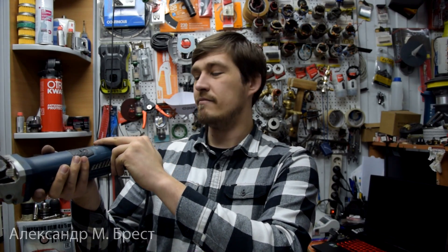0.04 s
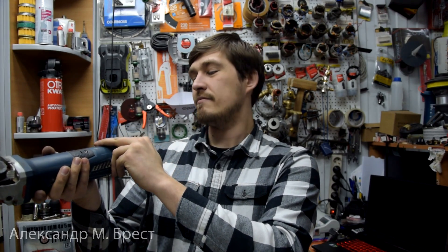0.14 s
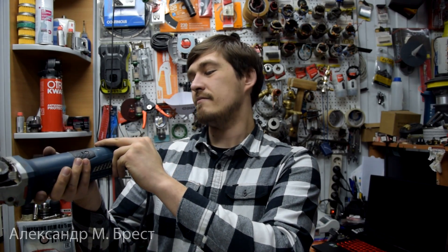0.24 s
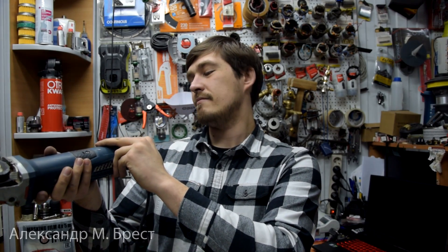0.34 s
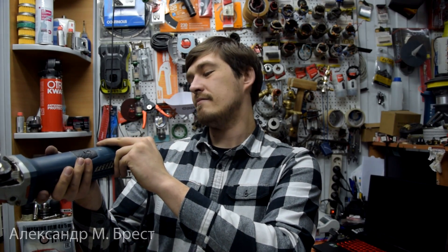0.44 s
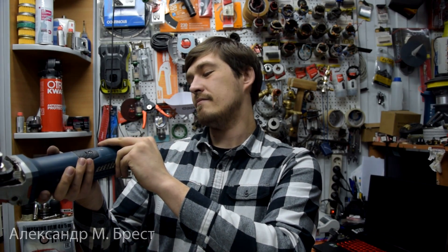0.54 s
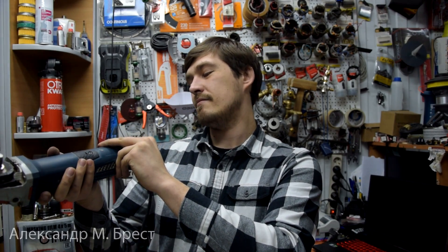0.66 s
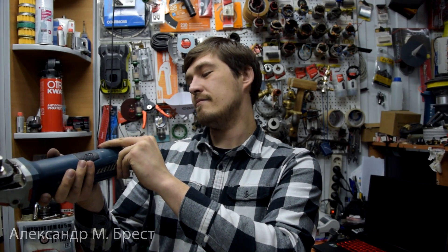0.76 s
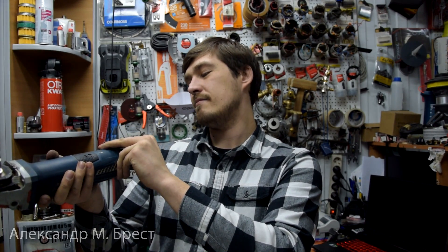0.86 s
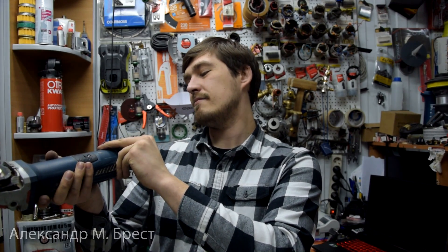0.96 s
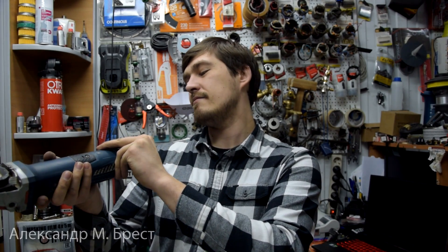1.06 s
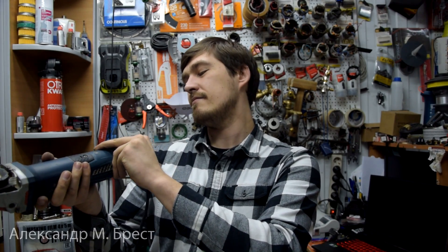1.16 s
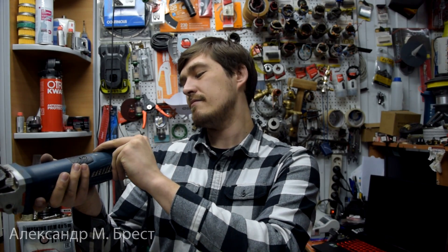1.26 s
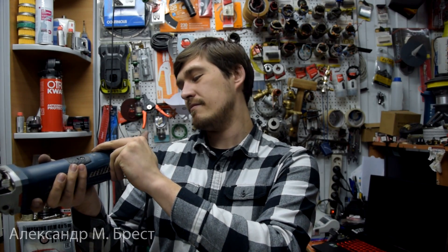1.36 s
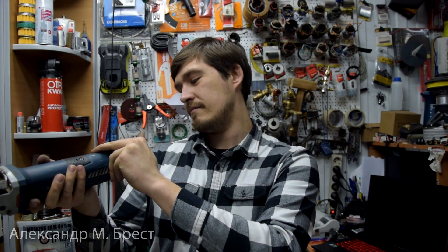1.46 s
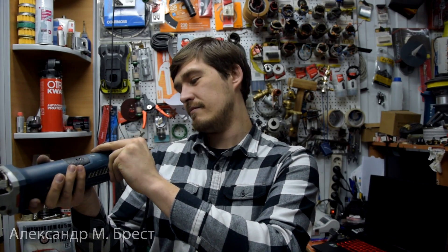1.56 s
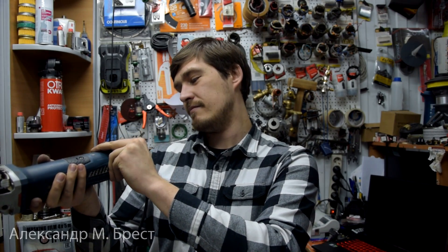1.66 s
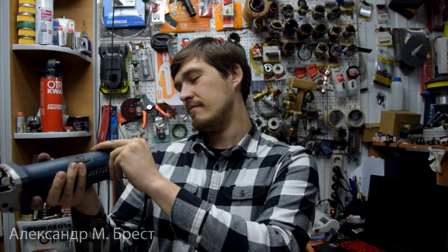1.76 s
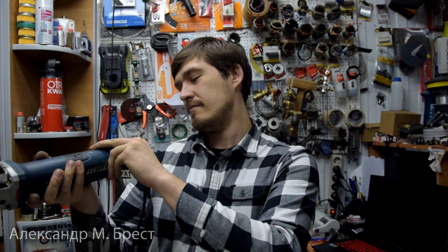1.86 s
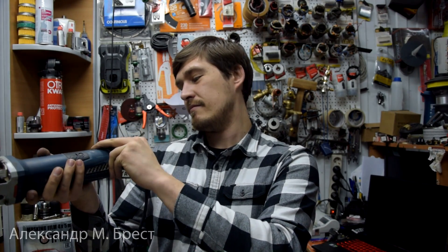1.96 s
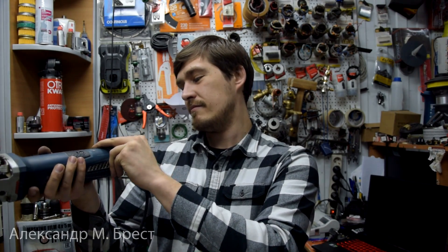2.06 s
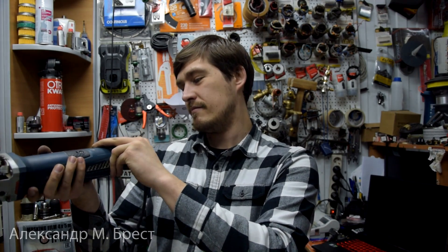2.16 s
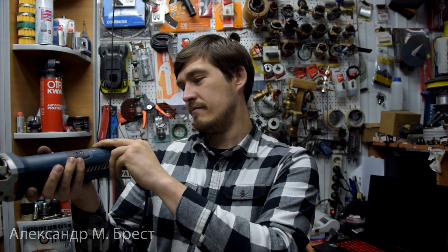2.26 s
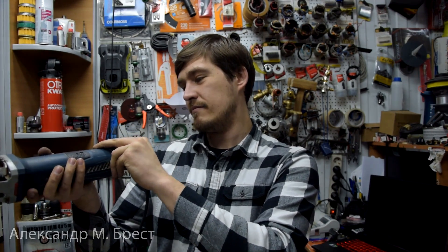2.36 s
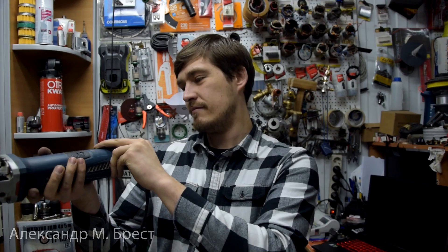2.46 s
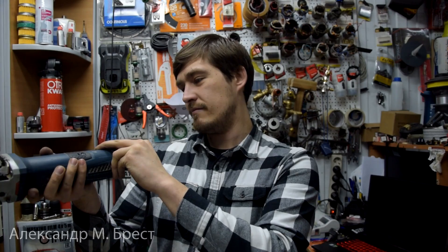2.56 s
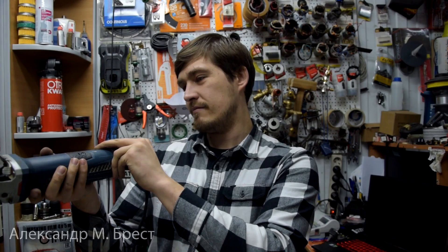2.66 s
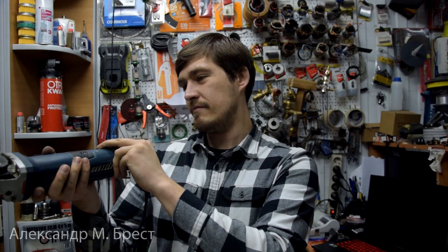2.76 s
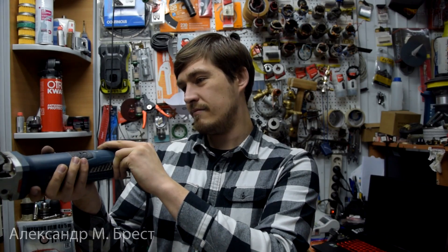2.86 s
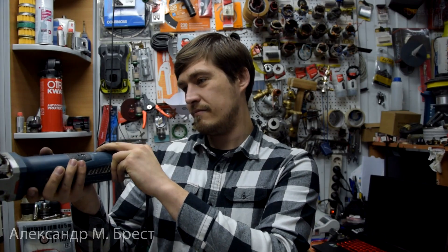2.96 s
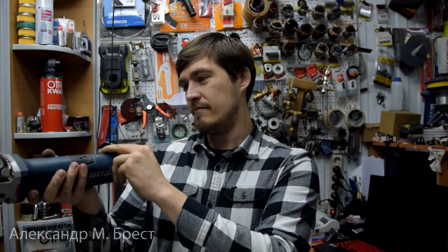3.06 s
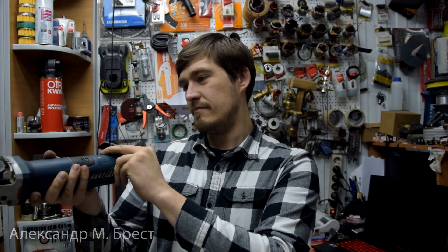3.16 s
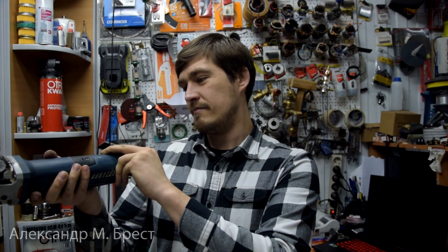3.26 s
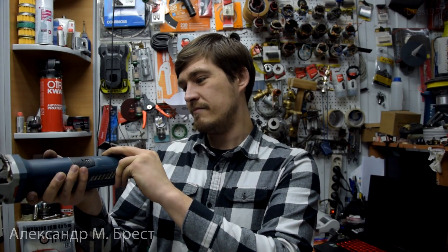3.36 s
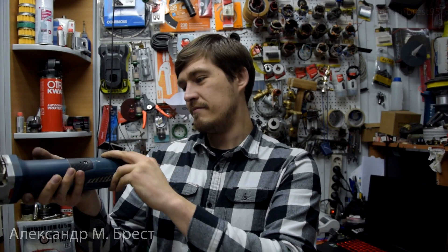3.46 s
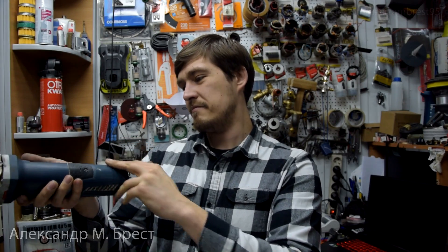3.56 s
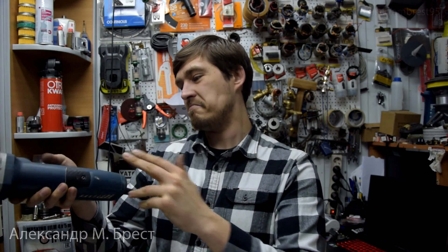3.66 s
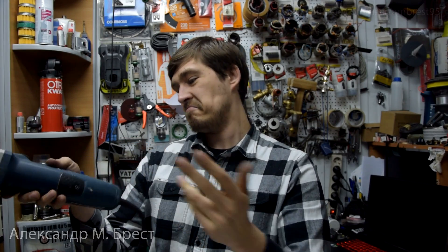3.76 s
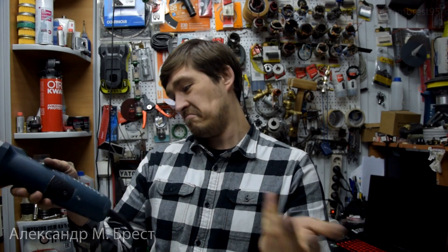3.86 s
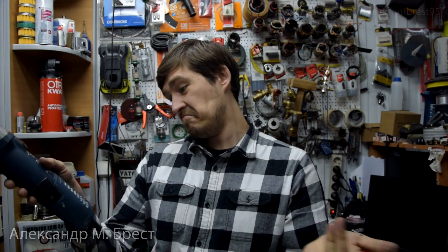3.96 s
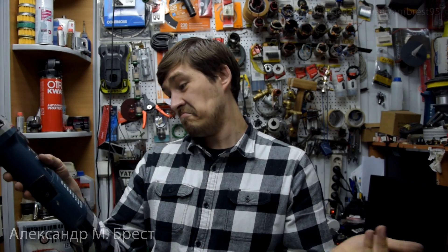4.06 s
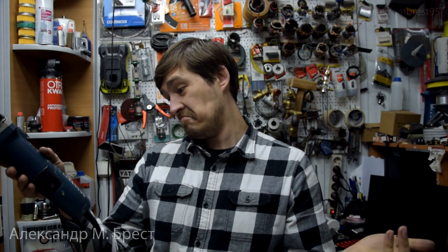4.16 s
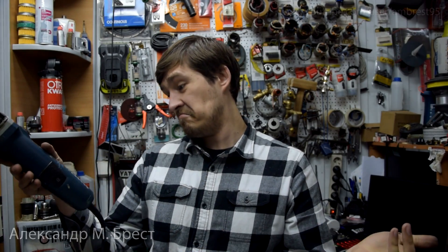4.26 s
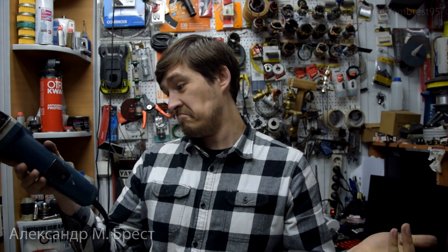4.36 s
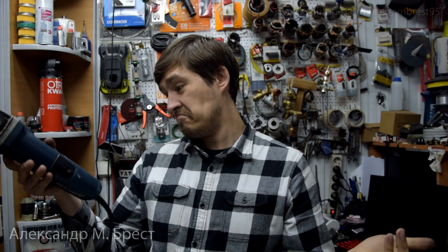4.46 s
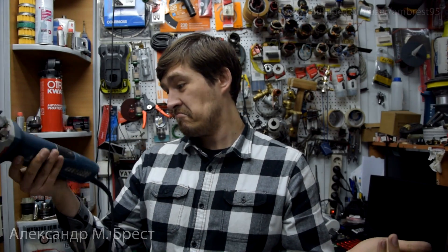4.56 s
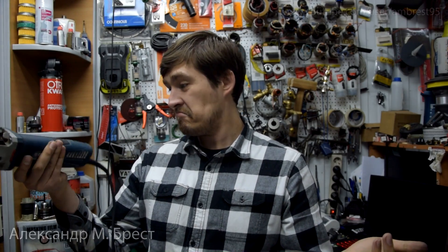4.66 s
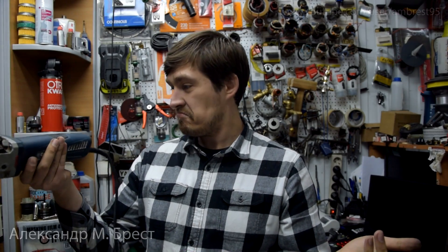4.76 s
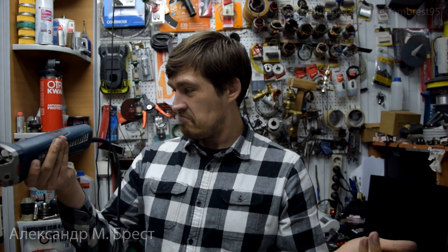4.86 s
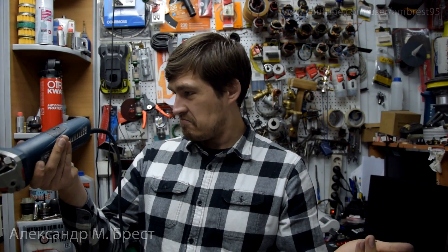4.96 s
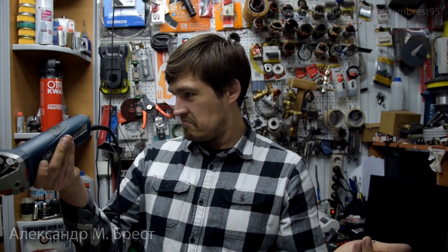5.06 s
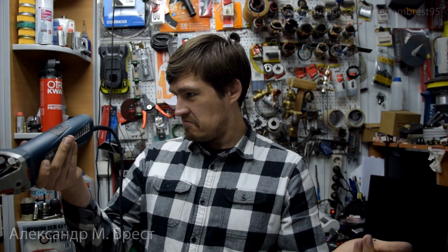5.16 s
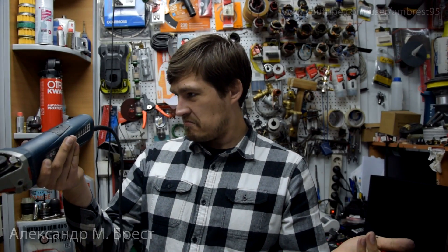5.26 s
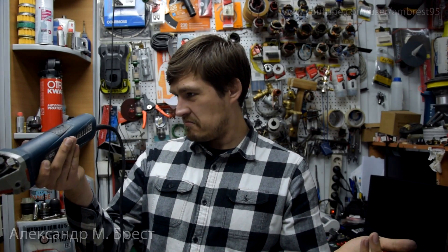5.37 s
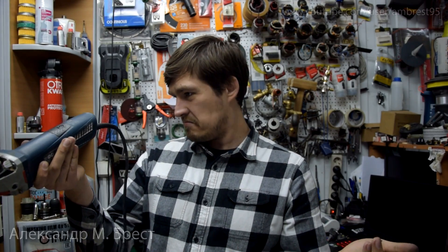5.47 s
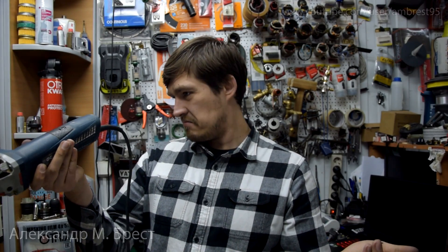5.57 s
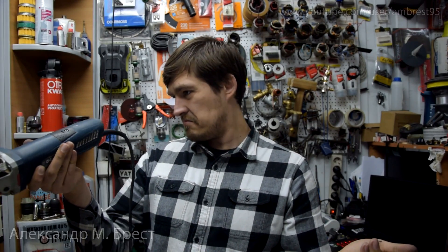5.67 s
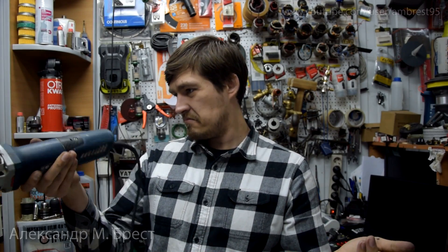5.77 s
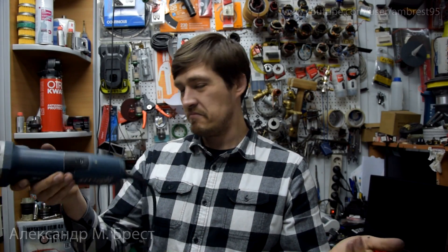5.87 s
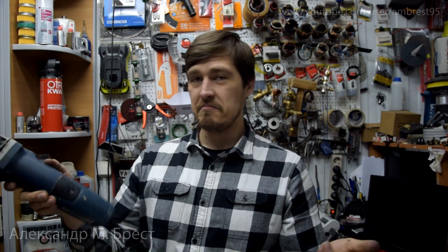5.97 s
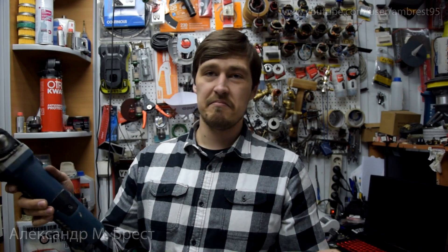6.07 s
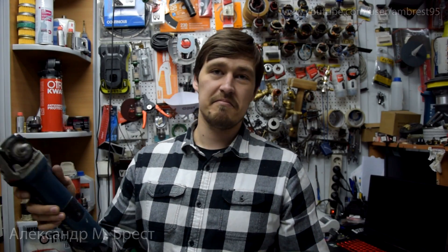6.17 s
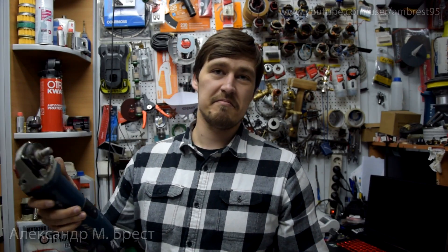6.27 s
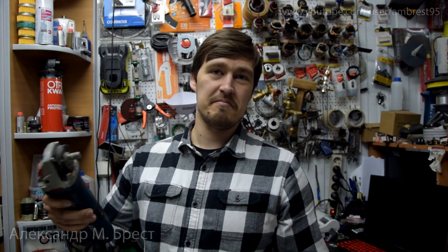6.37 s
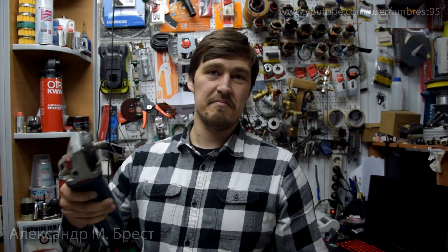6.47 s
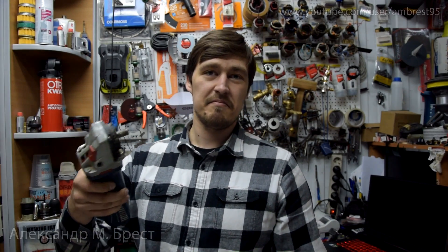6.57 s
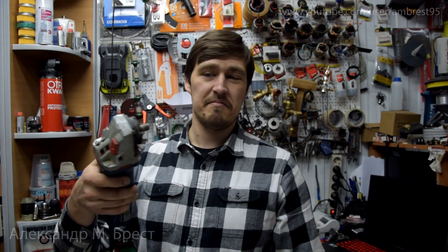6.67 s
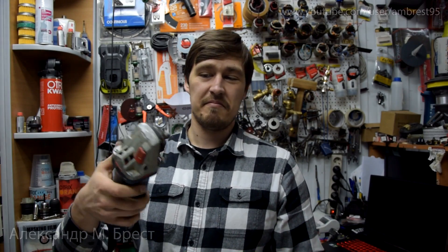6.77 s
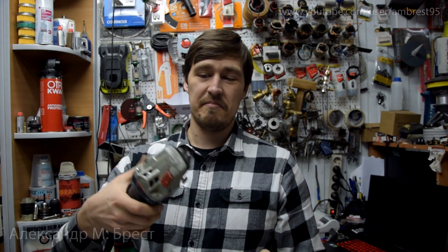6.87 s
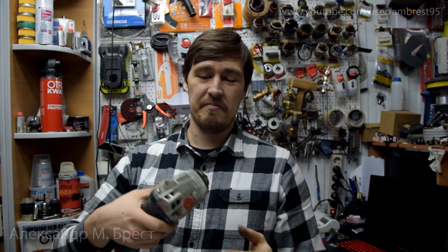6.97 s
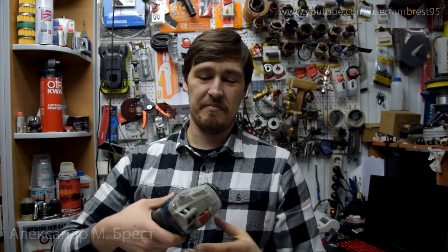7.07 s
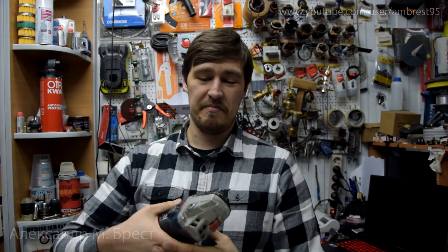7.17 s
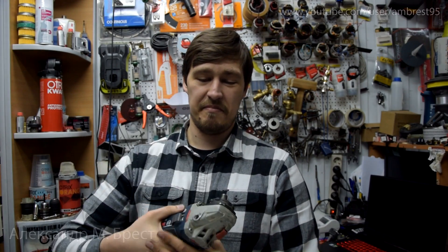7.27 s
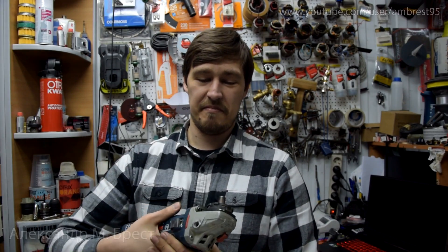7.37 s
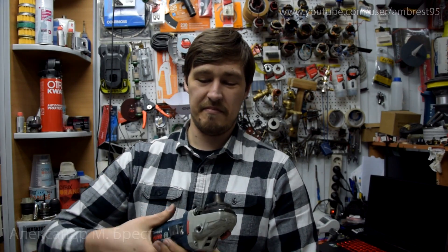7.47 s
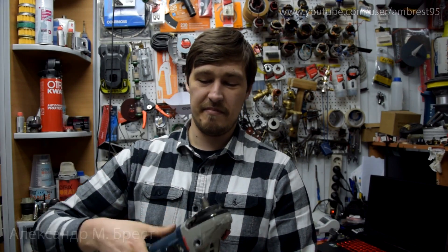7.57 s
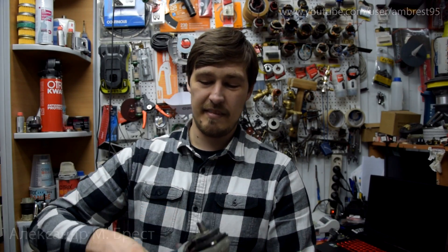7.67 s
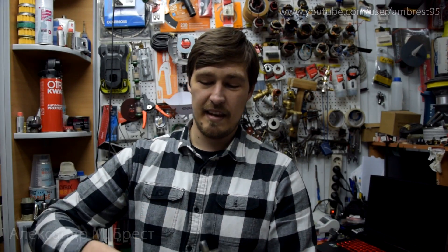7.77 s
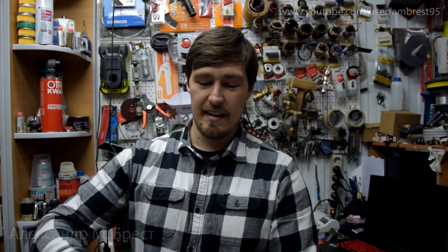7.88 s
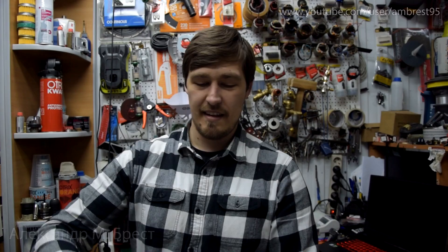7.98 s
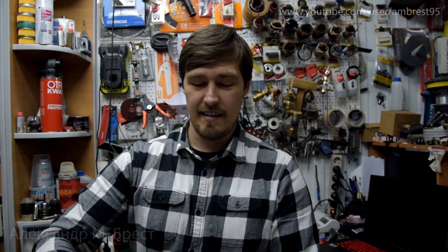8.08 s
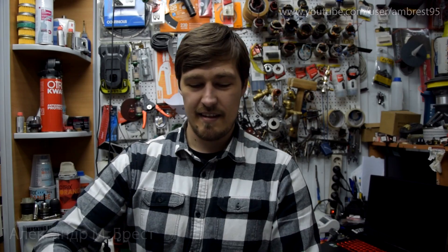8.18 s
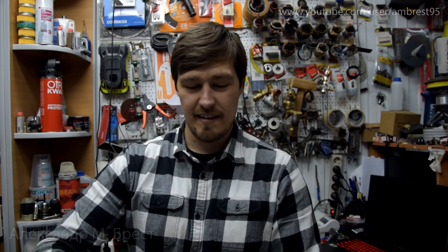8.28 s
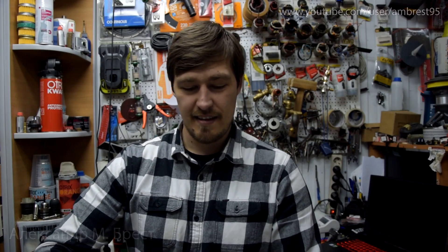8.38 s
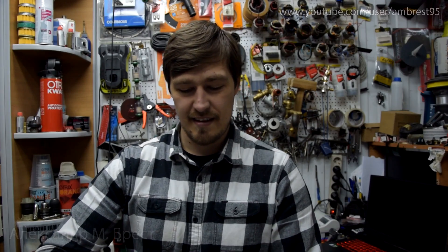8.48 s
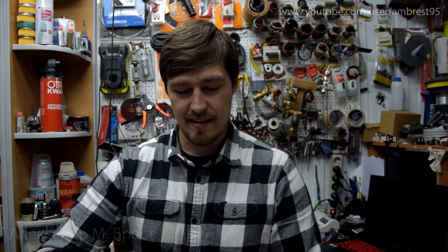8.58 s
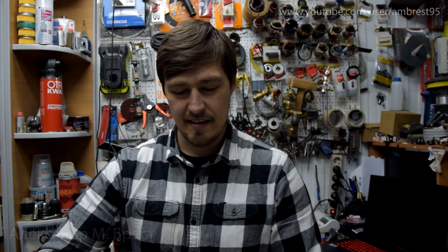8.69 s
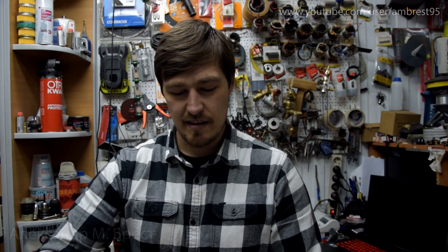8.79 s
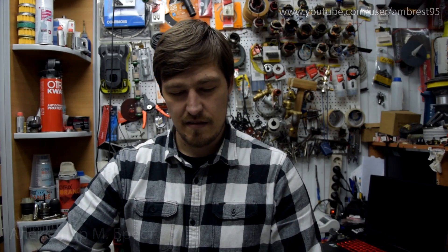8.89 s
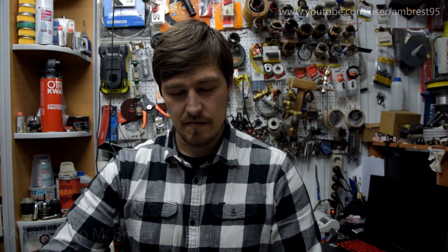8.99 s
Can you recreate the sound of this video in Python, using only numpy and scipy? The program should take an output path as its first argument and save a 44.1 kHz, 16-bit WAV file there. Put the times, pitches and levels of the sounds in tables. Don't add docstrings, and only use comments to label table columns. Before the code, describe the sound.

An unloaded angle grinder is heard about a metre away in a small, cluttered workshop with short scattered reflections. It starts at moderate speed, briefly powered with a faint electric crackle, and from 1.0 s coasts down to a softer airy whirr with thin fan whistle. At 1.9 s a harsh buzzing kick jolts it upward; a second snarling kick follows at 2.2 s, and by about 2.8 s it reaches full speed. Until 6.7 s it holds a loud, broad, bright roar over a steady motor hum, its treble opening around 4.2 s as the vents turn toward the microphone. Near 6.3-7 s a hollow whistling band slides down. Power is cut at 6.7 s; pitch and loudness fall, with faint low gusts around 7.3 s. From 7.7 s loose gears knock, sparse at first, then rattling densely around 8.4-8.9 s and weakening to the end at 9 s. A very faint low thud falls near 8.05 s.

```python
import sys
import numpy as np
from scipy import signal
from scipy.fft import rfft, irfft, next_fast_len
from scipy.io import wavfile
from scipy.ndimage import uniform_filter1d

SR = 44100
rng = np.random.default_rng(int(sys.argv[2]) if len(sys.argv) > 2 else 0)


def unload_wav(signal):
    wavfile.write(
        sys.argv[1],
        SR,
        np.round(np.clip(np.atleast_2d(signal).T, -1, 1) * 32767).astype(np.int16),
    )


def nominal_scale(level):
    x = np.asarray(level, float) / 20
    return 10 ** x


N = 398223
T, SIZE = np.arange(N) / SR, next_fast_len(N + SR // 4)
HZ = np.arange(SIZE // 2 + 1) * SR / SIZE

# start in seconds, shaft speed aimed for in Hz, time constant in seconds.
SPEED_GOALS = [
    (0, 60, 1.85),
    (.2, 322, .12),
    (.6, 308, .6),
    (1.0, 60, 1.6),
    (1.9, 600, .85),
    (2.04, 268, .1),
    (2.16, 430, .125),
    (2.45, 598.6, .17),
    (6.72, 250, .7),
    (7.35, -91, 2.22),
]
START_HZ, FULL_HZ, COAST_HZ = 340, 598.6, 260
# time in seconds, nearness in dB, rear vents aimed at the microphone 0-1,
# shadow of the gripping hand up to 1, below 0 a boost.
POSE = [(0, -1, 0.05, 0.1), (1, -1.5, 0, 0), (1.8, .5, 0, 0), (2.15, -0.5, 0, 0), (2.45, -1.5, 0, .35),
        (2.75, 0.5, 0.24, 0.54), (3.5, 0, 0.3, 0.23), (4.2, -0.5, 1, 0), (4.5, -0.5, .7, 0.12),
        (4.75, -.5, 0, 0.33), (5.3, 0, 0, 0.33), (6.2, -.5, 0.3, 0.1), (6.6, 0, 0, 0.15),
        (7.2, -1.5, 0.6, .05), (7.6, -1, 0.25, -.4), (8.0, 0, 0.9, -.1), (8.6, -1.5, 0.24, 0),
        (9.03, 2, .1, 0)]
# time in seconds, boom near 650 Hz in dB, hollow near 1.4 kHz up to 1,
# below 0 a boost.
CRADLE = [(0, 2.5, .08), (1.1, 0.5, 0), (1.3, -3, .5), (1.9, -3, .7), (2.2, 1, 0), (6.3, -1, -.1),
          (7.1, -1, -.2), (7.75, -8, .04), (8.2, 4.5, .6), (9.03, 1, .1)]

# frequency in Hz, level in dB per Hz.
FAST_ROAR = [(24, -78), (40, -57), (335, -23), (409, -23.5), (525, -20.5), (595, -10), (887, -13),
             (1200, -6), (1620, -6), (2350, 4), (3170, -4), (5100, -2.5), (7240, -6), (10800, 0.5),
             (15700, -15)]
# frequency in Hz, level in dB per Hz.
SLOW_ROAR = [(24, -67), (40, -54), (310, -12.5), (343, -8), (370, -17.5), (538, -6), (595, -3), (657, 2),
             (1200, -2.5), (1970, 7), (2660, 1.5), (4610, 5.5), (7060, -6), (8620, -8), (15700, -37)]
# frequency in Hz, width in Hz, dB at speed, dB coasting.
HOUSING = [(412, 37, 5, 8.5), (592, 78, -0.5, 2), (985, 32, 4.5, 5.5), (1350, 280, 0, 5.5),
           (2340, 480, -6, 6), (3620, 780, 3, 1.5), (5100, 400, 1.5, 0), (7380, 780, -0.5, -5),
           (8330, 400, -1.5, 1), (8300, 710, 3.5, -3.5), (10900, 1300, 0, 7.5)]
# coasting in dB, at speed in dB, under strain in dB,
# vents aimed in dB, gear head facing at 7.28 s in dB.
ROAR_BANDS = [(-4, -13, 3.5, 1.8, 2), (-5.5, -4, 7, -0.7, 3), (-1, 0.02, 7.5, 0.9, -2.1),
              (1.5, -2, 2, -5, 0.5)]
# start in seconds, length in seconds, strength 0-1.
JOLTS = [
    (1.935, 0.1, 0.96),
    (2.195, 0.24, 0.25),
]

# multiple of
# shaft speed, level in dB rms at full speed.
UNBALANCE = [(1, -56.5), (2, -53.5), (3, -48.5), (4, -39.5), (5, -46.5), (6, -57), (8.26, -50.5), (14, -52)]
# time in seconds, level in dB.
FACING = [(2.8, -33), (3.3, -1), (3.8, 7), (4.5, 6), (5.5, 4.5), (6.2, 3), (6.45, -19), (6.85, 7.5),
          (7.1, -38)]
# blade rate in Hz, level in dB rms.
FAN_WHISTLE = [(5300, -78), (7400, -64), (8200, -53), (9900, -47), (11900, -45.5), (13500, -48),
               (14800, -55)]
# multiple of shaft speed, start in seconds, end in seconds, level in dB rms.
WHINES = [
    (24, 1.0, 1.9, -60),
    (31, 1.0, 1.9, -62),
    (12, 1.0, 1.9, -62),
    (7, 8.4, 8.92, -59),
]

# start in seconds, length in seconds.
CURRENT_TIMES = [(0, .93), (1.937, .095), (1.915, .6), (2.197, .11), (2.55, .08)]
# spark in dB, slot tone in dB, swell in dB per second.
CURRENT_LEVELS = [(-46, -70, 4), (-39, -34, 30), (-45, -60, 0), (-30.5, -25, -22), (-28.5, -55, -20)]
# frequency in Hz, width in Hz, level in dB.
SPARK_RINGS = [(3900, 510, 1), (4700, 1000, -15), (6070, 540, 3.5), (8800, 490, 3), (10910, 780, 7),
               (13500, 3000, -11)]

# time in seconds, peak level in dB.
KNOCKS = [(7.7394, -30), (7.8594, -26), (7.883, -23.5), (7.9937, -26), (8.108, -29), (8.3429, -28),
          (8.4044, -29), (8.4274, -26), (8.4594, -24), (8.4774, -28), (8.4994, -26.5), (8.5294, -26),
          (8.5614, -23), (8.5824, -27), (8.6154, -26), (8.6314, -25.5), (8.6537, -24), (8.6779, -25),
          (8.6986, -28), (8.7131, -27), (8.7355, -29), (8.7504, -30), (8.7799, -26), (8.7999, -28),
          (8.8164, -29), (8.8378, -28), (8.8782, -33), (8.9134, -31), (8.9474, -34), (8.9854, -32)]
# frequency in Hz, width in Hz, level in dB, share of the upper ring's tilt.
GEARBOX = [(640, 200, -12.5, -1), (2005, 280, -2.5, 0.3), (2300, 380, -3.5, -0.9), (2870, 360, -8, 1.2),
           (3490, 390, -3, 1.4), (4730, 230, -8, 0.38), (5600, 300, -8, 0.58)]
# time in seconds, upper ring against lower in dB.
GEAR_SIDE = [(7.8, 7.5), (8.35, -8), (8.55, -2), (8.75, 4), (9.0, 3)]
# time in seconds, frequency in Hz, width in Hz, level in dB.
THUD = [
    (8.045, 156, 52, -62),
]

# time in seconds, frequency in Hz, level in dB rms.
POCKET = [(6.1, 1400, -56), (6.3, 1330, -49), (6.55, 1187, -41.5), (6.75, 1072, -39.5), (6.95, 1046, -45),
          (7.1, 1050, -60)]
# time in seconds, peak level in dB.
JET = [
    (7.25, -66),
    (7.4, -70),
]
# frequency in Hz, level in dB against direct sound.
ROOM = [(40, 11), (125, -2), (250, -15), (500, -9), (1000, -10), (2000, -6.5), (4000, -8.5), (8000, 0),
        (12000, -3), (15500, 11)]
# frequency in Hz, left minus right in dB.
LEAN = [(100, -4.5), (250, 2.5), (500, 0), (2000, 0), (4000, 0), (6500, 1.5), (8500, -4), (12000, 0)]


def curve(table):
    s, *columns = np.transpose(table)
    return [np.interp(T, s, column) for column in columns]


def colour(points):
    hz, db = np.transpose(points)
    return np.interp(np.log(HZ + 1), np.log(hz), db)


def ring(hz, width):
    return 1j * HZ * width / (hz ** 2 - HZ ** 2 + 1j * HZ * width)


def through(x, response):
    return irfft(rfft(x, SIZE) * response, SIZE)[..., :N]


def unit(x):
    return x / np.sqrt(np.mean(x ** 2))


def smooth_twice(x, width):
    return uniform_filter1d(uniform_filter1d(x, width), width)


def walk(rate):
    hold = int(SR / rate)
    steps = np.repeat(rng.standard_normal(N // hold + 1), hold)
    return 0.96 * smooth_twice(steps, hold)[:N]


def swing(before, after):
    return np.interp(T, (6.1, 6.95), (before, after))


def lowered(value):
    return np.interp(T, (7.8, 8.3), (0, value))


def shaft():
    speed, goal = np.full(N, float(START_HZ)), np.zeros(N)
    for s, hz, lag_s in SPEED_GOALS:
        i = int(s * SR)
        speed[i:] = hz + (speed[i] - hz) * np.exp((s - T[i:]) / lag_s)
        goal[i:] = hz
    coasting = uniform_filter1d((goal < COAST_HZ).astype(float), 4000)
    return uniform_filter1d(speed + 0.31 * walk(4), 2000), coasting


def effort(speed):
    return -23.5 + 2.097 * 20 * np.log10(speed / FULL_HZ) + curve(POSE)[0]


def gear_strain():
    strain = 0
    for s, length, strength in JOLTS:
        inside_s = np.minimum(2 * (T - s), s + length - T)
        strain = strain + strength * np.clip(inside_s / 0.02, 0, 1)
    return strain


def roar(speed):
    fast = np.clip((speed - 200) / 330, 0, 1)
    strain, aim = gear_strain(), curve(POSE)[1]
    sweep = np.exp(-((T - 7.28) / 0.45) ** 2)
    levels = []
    for coast_db, fast_db, strain_db, aim_db, sweep_db in ROAR_BANDS:
        running_db = coast_db + (fast_db - coast_db) * fast
        levels.append(effort(speed) + running_db + strain_db * strain + aim_db * aim + sweep_db * sweep)
    low = [1 / (1 + (HZ / edge_hz) ** 8) for edge_hz in (1400, 3200, 7000)]
    bands = [low[0], low[1] - low[0], low[2] - low[1], 1 - low[2]]
    shake = 0.52 * walk(300) + 0.61 * walk(12)
    out = 0
    for spectrum, share, column in ((FAST_ROAR, fast, 2), (SLOW_ROAR, 1 - fast, 3)):
        db = colour(spectrum)
        for mode in HOUSING:
            db = db + mode[column] * np.abs(ring(mode[0], mode[1])) ** 2
        grains = rng.standard_normal(N) * nominal_scale(shake + 1.2 * rng.exponential(size=N))
        chatter = rfft(grains, SIZE) * nominal_scale(db)
        for band, level_db in zip(bands, levels):
            sound = unit(irfft(chatter * band, SIZE)[:N])
            out = out + np.sqrt(share) * nominal_scale(level_db + 0.5 * walk(15)) * sound
    return out


def pose(x):
    _, aim, shadow = curve(POSE)
    boom_db, hollow = curve(CRADLE)
    vent_treble = through(x, 1 / (1 + (9800 / (HZ + 1)) ** 16))
    x = x + (nominal_scale(-2.5 + 6.5 * aim) - 1) * vent_treble
    top_treble = through(x, 1 / (1 + (12000 / (HZ + 1)) ** 24))
    x = x + (nominal_scale(swing(0, -0.5) + lowered(-7)) - 1) * top_treble
    x = x + lowered(0.64) * through(x, ring(8200, 180))
    x = x + (nominal_scale(boom_db) - 1) * through(x, ring(650, 160))
    whine, body = through(x, ring(3380, 630)), through(x, ring(1370, 860))
    return x - np.minimum(shadow, 0.9) * whine - np.minimum(hollow, 0.9) * body


def tones(turns, coasting):
    def sine(multiple, wobble_db):
        phase = 2 * np.pi * (multiple * turns + rng.random())
        return np.sqrt(2) * nominal_scale(wobble_db * walk(7.3)) * np.sin(phase)

    out = nominal_scale(curve(FACING)[0]) * sum(nominal_scale(db) * sine(multiple, 1.4) for multiple, db in UNBALANCE)
    blade_hz = np.gradient(turns) * 39 * SR
    fan_db = np.interp(blade_hz, *np.transpose(FAN_WHISTLE)) - 13 * (1 - coasting)
    out = out + (blade_hz < 0.4 * SR) * nominal_scale(fan_db) * sine(39, 1.5)
    for multiple, start, end, db in WHINES:
        swell = np.sin(np.pi * np.clip((T - start) / (end - start), 0, 1))
        out = out + nominal_scale(db) * swell * sine(multiple, 3.3)
    return out


def current():
    s, length = np.transpose(CURRENT_TIMES)[..., None]
    spark_db, slot_db, swell = np.transpose(CURRENT_LEVELS)[..., None]
    age = T - s
    onset, cut = 1500 * np.minimum(age, 0), 500 * np.maximum(age - length, 0)
    shape = swell * np.clip(age, 0, length) + onset - cut
    return np.maximum((spark_db + shape).max(0), -60), np.maximum((slot_db + shape).max(0), -70)


def chopper(turns):
    spark_db, slot_db = current()
    half_waves_hz, first_s, jitter_s = 100, 0.0072, 0.00038
    count = int(N / SR * half_waves_hz) - 1
    lateness, strength = rng.standard_normal((2, count))
    at = ((first_s + np.arange(count) / half_waves_hz + jitter_s * lateness) * SR).astype(int)
    fire = np.zeros(N)
    fire[at] = nominal_scale(1.7 * strength)
    surge = signal.lfilter([1], [1, -np.exp(-1 / (0.0011 * SR))], fire)
    burst = surge * rng.standard_normal(N)
    sparks = 0
    for hz, width, db in SPARK_RINGS:
        sparks = sparks + nominal_scale(db + 2.7 * walk(11.1)) * through(burst, ring(hz, width) ** 2)
    pull = signal.lfilter([1], [1, -np.exp(-1 / (0.0015 * SR))], surge)
    slot_phase = 2 * np.pi * 12 * turns + 4.0 * walk(650)
    slots = np.sin(slot_phase) + nominal_scale(-13) * np.sin(2 * slot_phase)
    return nominal_scale(spark_db) * unit(sparks) + nominal_scale(slot_db) * unit(pull) * slots


def knocks():
    s, db = np.transpose(KNOCKS)
    gap = np.diff(s)
    soft = (s[:-1] + gap / 2)[(gap > 0.027) & (gap < 0.045)]
    s, db = np.append(s, soft), np.append(db, np.full(len(soft), -33.0))
    upper_db = np.interp(s, *np.transpose(GEAR_SIDE))
    at, out = (s * SR).astype(int), 0
    scatter_db = rng.standard_normal((len(s), len(GEARBOX)))
    for k, (hz, width, mode_db, upper) in enumerate(GEARBOX):
        blow_db = db + mode_db + upper * upper_db + scatter_db[:, k]
        blows = np.zeros(N)
        blows[at] = nominal_scale(blow_db) * SR / (2 * width)
        out = out + through(blows, ring(hz, width) ** 2)
    return nominal_scale(-8.5) * out


def bench_thud():
    (s, hz, width, db), = THUD
    blow = nominal_scale(db) * SR / width * (np.arange(N) == int(s * SR))
    return through(blow, ring(hz, width) ** 2)


def pocket():
    hz, db = curve(POCKET)
    breath = unit(smooth_twice(rng.standard_normal(N), 200))
    tone = np.sqrt(2) * np.sin(2 * np.pi * np.cumsum(hz) / SR)
    return nominal_scale(db - 60 * (T > POCKET[-1][0])) * breath * tone


def jet():
    s, db = np.transpose(JET)[..., None]
    rise, fall = 280 * (s - T), 120 * (T - s)
    gust = nominal_scale(db - np.maximum(rise, fall)).sum(0)
    rumble = through(rng.standard_normal((2, N)), ring(30, 40) ** 2 / (1 + (HZ / 75) ** 6))
    return gust * unit(rumble) * nominal_scale(np.array([[6], [0.1]]))


def shelves(x):
    hop, t60_s = 8192, 0.25
    age = np.arange(2 * hop) / SR
    decay = (age > 0.002) * np.exp(-np.log(1000) * age / t60_s)
    decay = decay / np.sqrt(np.sum(decay ** 2))
    padded, out = np.pad(x, (hop, 2 * hop)), np.zeros((2, N + 8 * hop))
    window = np.sin(np.pi * np.arange(2 * hop) / (2 * hop))
    for i in range(0, N + hop, hop):
        tail = rng.standard_normal((2, 2 * hop)) * decay
        piece = padded[i:i + 2 * hop] * window
        out[:, i:i + 4 * hop] += irfft(rfft(tail, 4 * hop) * rfft(piece, 4 * hop))
    return out[:, hop:hop + N]


def at_microphone(tool, sing):
    wet = nominal_scale(colour(ROOM))
    lean_db = colour(LEAN) - np.mean(np.transpose(LEAN)[1])
    ports = nominal_scale(np.array([lean_db, -lean_db]) / 2) / np.sqrt(1 + wet ** 2)
    heard = through(tool + sing, ports) + through(shelves(tool + 0.48 * sing), wet * ports)
    pan_db = swing(2, 0)
    return heard * nominal_scale(np.array([pan_db, -pan_db]) / 2)


def floor(speed):
    rumble = unit(through(rng.standard_normal((2, N)), ring(65, 55)))
    return nominal_scale(-79 + 0.25 * (effort(speed) + 32) + 3.1 * walk(5)) * rumble


def scene():
    speed, coasting = shaft()
    turns = np.cumsum(speed) / SR
    tool = pose(roar(speed)) + chopper(turns) + knocks() + bench_thud() + pocket()
    return at_microphone(tool, tones(turns, coasting)) + jet() + floor(speed)


def roll_off(x):
    return signal.sosfilt(signal.butter(12, 15830, fs=SR, output="sos"), x)


def record(dry):
    return roll_off(dry)


dry = scene()
out = record(dry)
unload_wav(out)
```